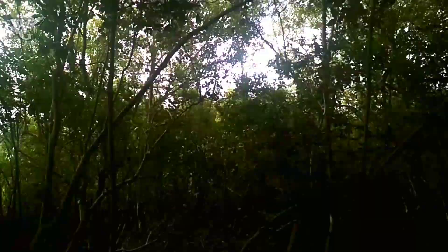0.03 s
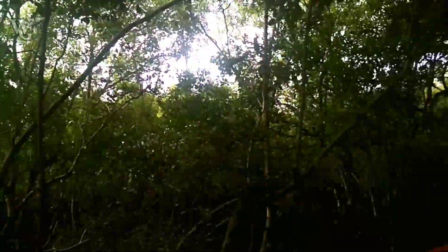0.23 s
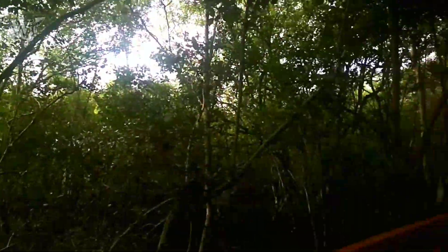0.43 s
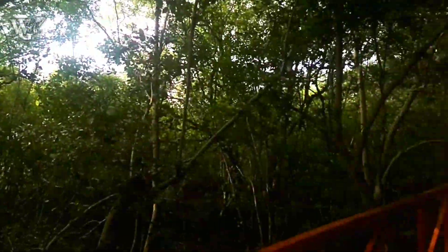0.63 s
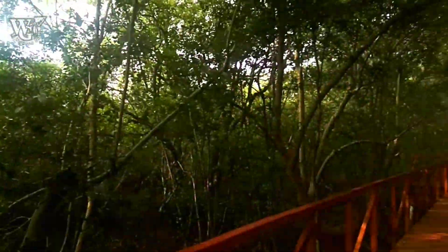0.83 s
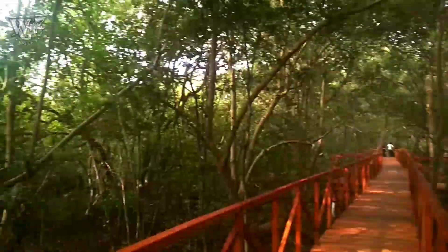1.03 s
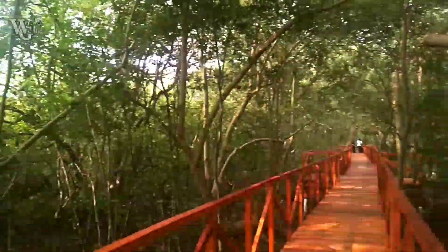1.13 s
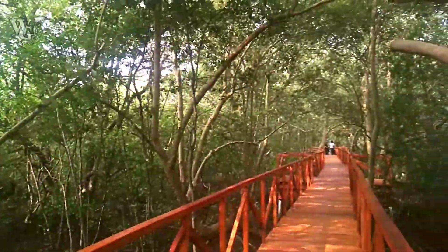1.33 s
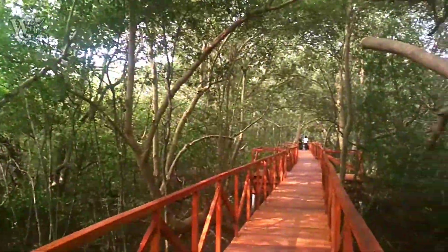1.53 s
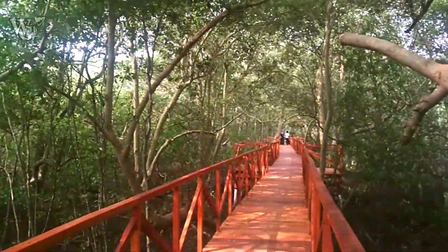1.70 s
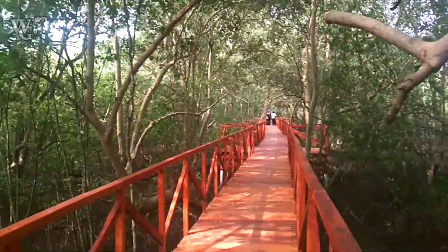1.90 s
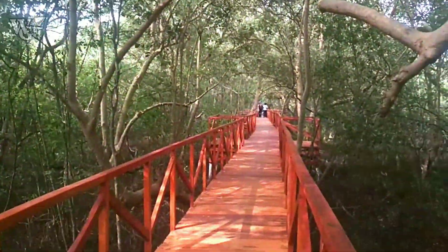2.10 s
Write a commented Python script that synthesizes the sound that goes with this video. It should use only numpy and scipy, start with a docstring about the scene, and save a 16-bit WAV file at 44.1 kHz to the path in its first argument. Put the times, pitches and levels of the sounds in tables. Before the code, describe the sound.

Wind rumbles and thumps unevenly on a hand-held microphone moving along a wooden boardwalk in a forest. Light, irregular footstep knocks and dry scuffs sit within it, while small birds chirp faintly and a high insect sings in phrases.

```python
"""Mangrove boardwalk, wind on the microphone.

Air buffets the two ports of a hand-held microphone: the eddy rumble swells and thumps with the
walker's movement and clips at its peaks. Light knocks and dry scuffs sit within it.
Behind, small birds chirp among echoing trees and a high insect sings in phrases,
over a far insect chorus and the hush of the wood."""
import sys
import numpy as np
from scipy import signal
from scipy.fft import rfft, irfft
from scipy.io import wavfile
from scipy.ndimage import uniform_filter1d, minimum_filter1d

SR = 44100
rng = np.random.default_rng(int(sys.argv[2]) if len(sys.argv) > 2 else 0)


def persist_wave(psi):
    """Save psi, clipped to +-1, as 16-bit WAV."""
    counts = np.round(np.clip(psi, -1, 1) * 32767).astype(np.int16)
    wavfile.write(sys.argv[1], SR, np.atleast_2d(counts).T)


N = 95167
TIME_S = np.arange(N) / SR
FREQ_HZ = np.maximum(np.fft.rfftfreq(N, 1 / SR), 1)

# airflow at each port: (time [s], level [dB], eddy roll-off corner [Hz])
AIRFLOW_LEFT = [(0.0,1.5,230), (0.06,-13,200), (0.10,-26.5,144), (0.138,-42.5,141.4), (0.15,-18.5,160),
                (0.25,-11,339.6), (0.31,-18.5,240), (0.36,-12,432), (0.39,-17.5,271), (0.52,-17,180),
                (0.63,-9,305.6), (0.66,-17.5,240), (0.76,-28.5,180), (0.88,-36,150), (0.99,-17.5,150),
                (1.02,-32.5,170), (1.07,-19,200), (1.16,-4,280), (1.20,-24,208), (1.26,-41,178),
                (1.35,-21.5,140), (1.44,-28.5,180), (1.5,-18.5,150), (1.64,-27,180), (1.7,-26,170),
                (1.89,-26,160), (1.93,-23,160), (2.04,-28.5,210), (2.16,-22.5,190)]
AIRFLOW_RIGHT = [(0.0,-32,189.6), (0.07,-34,169.5), (0.16,-29.5,163.4), (0.22,-16.5,244.3),
                 (0.25,-32,254.6), (0.28,-17,224.5), (0.5,-16,282), (0.53,-24,287.5), (0.6,-23,245),
                 (0.64,-17,307), (0.74,-16.5,369), (0.85,-25,184), (0.91,-15.5,390), (0.96,-22.5,268),
                 (1.03,-15,287), (1.2,-15,372), (1.33,-25.5,180.3), (1.4,-15,308), (1.5,-17,305.6),
                 (1.65,-14,287.6), (1.73,-17,230.5), (1.81,-18,418), (1.94,-20,244), (2.03,-21,270),
                 (2.16,-16.5,332.4)]
# airflow trim: (left [dB], right [dB])
AIR_TRIM_DB = [3.5, 0.0]
# port response to air: (frequency [Hz], gain [dB])
PORT_RESPONSE = [(10, -27), (25, -7), (60, -5.5), (110, 2), (170, -4.5), (320, -4.5), (500, -10),
                 (780, -7.5), (1050, -17), (1500, -32)]
# dull thumps: (time [s], level [dB], pitch [Hz], Gaussian width [s])
PORT_THUMPS_LEFT = [(.0075, 2.5, 113, 0.0045), (0.152, -0.5, 70.3, 0.0046), (0.227, 4, 129.6, 0.0025),
                    (.2420, 5.5, 130.5, 0.0068), (.2530, 6, 195, 0.0016), (0.345, 4.5, 141.6, 0.0096),
                    (.3620, 7.5, 245.6, 0.0047), (0.367, 2.5, 159.4, 0.0035), (.4430, 0.5, 98, 0.0035),
                    (0.62, -1, 195, 0.0019), (1.0662, 2, 129.6, 0.003), (1.1380, 4, 114.5, 0.00635),
                    (1.1560, 2, 139, 0.0014), (1.8740, -2, 108, 0.0027)]
PORT_THUMPS_RIGHT = [(0.362, -1.5, 140, 0.0018), (0.492, 3, 140, 0.0031), (.9780, -1.5, 161, 0.0017),
                     (1.0567, 2, 160, 0.0018), (1.1700, 3.5, 225, 0.0013), (1.737, -3, 105, 0.005),
                     (1.7770, 3.5, 155, 0.002), (2.004, -1, 130, 0.0013)]
# fine turbulence on a thump: (frequency [Hz], gain [dB])
CHURN_SPECTRUM = [(120, -16.5), (300, 13), (550, 2), (900, -18), (1500, -34.5), (3000, -43.5),
                  (8000, -75.5)]
# falling bird notes: (onset [s], length [s], start [Hz], end [Hz], level [dB], left-right [dB])
BIRD_CHIRPS = [(0.267, 0.014, 7900, 7710, -73.5, 8), (0.285, 0.022, 7710, 6080, -46.5, -0.5),
               (0.577, 0.016, 7420, 5090, -47, 6), (1.029, 0.057, 7760, 5575, -36.5, 11),
               (1.371, 0.067, 7660, 6600, -48.5, 13), (1.408, 0.035, 6100, 5140, -50.5, 10.5)]
# arched bird calls: (onset [s], length [s], foot [Hz], top [Hz], level [dB], left-right [dB])
BIRD_CALLS = [(.0, 0.02, 1466, 1594, -39.5, 12.5), (.0, 0.033, 1860, 2574, -49.5, 19.5),
              (1.133, 0.065, 2028, 2720, -47, 16.5), (1.175, 0.047, 2450, 2870, -53.5, 19.5)]
# insect song: (start [s], end [s], level [dB], pitch [Hz])
INSECT_PHRASES = [(0, 0.394, -71.5, 8500), (0.095, 0.104, -50, 8490), (0.587, 0.911, -59, 8440),
                  (0.798, 0.83, -54.5, 8450), (0.964, 1.006, -50.5, 8440), (1.27, 1.75, -51.5, 8510),
                  (1.506, 1.715, -45.5, 8380), (1.934, 2.202, -55, 8410)]
# far insect chorus and hush of the wood: (frequency [Hz], gain [dB])
CHORUS_SPECTRUM = [(10500, -20), (11150, 3), (11400, -7.5), (11650, 2), (11950, -9.5), (12300, 1.5),
                   (12750, -9), (13100, -5.5), (13700, -14), (15200, -4.5), (16000, -34)]
HUSH_SPECTRUM = [(100, -5.5), (700, 4.5), (1300, -4.5), (2200, -11.5), (4000, -18.5), (7000, -21),
                 (10000, -23), (15000, -28)]
# their envelopes: (time [s], level [dB])
CHORUS_ENVELOPE = [(0, -73), (.45, -73.5), (.9, -65.5), (1.6, -65.5), (2.16, -70)]
HUSH_ENVELOPE = [(0, -60.5), (0.898, -62.5), (1.499, -59), (1.951, -60.5), (2.15, -51.5)]
# small knocks of air at the port: (time [s], level [dB], pitch [Hz], left-right [dB])
PORT_KNOCKS = [(.150, -27.5, 410, 14), (.432, -12, 420, 17), (.612, -23.5, 448, 28),
               (.643, -12, 380, -12), (.688, -10.5, 400, -18), (.704, -23.5, 520, -12.5),
               (.733, -19, 570, -26), (.879, -19, 430, -27), (.906, -10.5, 355, -36),
               (.914, -14, 489, -29), (.934, -6.5, 300, -33.5), (.977, -16.5, 430, -21.5),
               (1.037, -12, 380, -19), (1.268, -12, 268, -18.5), (1.398, -13, 393, -20),
               (1.545, -21, 500, -22.5), (1.560, -15.5, 480, -39), (1.612, -17.5, 450, -34),
               (1.648, -8.5, 420, -38), (1.699, -23, 546, -22), (1.808, -34, 450, -12),
               (1.83, -16.5, 480, -43), (1.883, -27.5, 480, -7.5), (1.911, -21, 600, -34),
               (1.995, -24.5, 750, -34), (2.055, -21.5, 420, -25)]
# scuffs and ticks: (onset [s], level [dB], centre [Hz], decay [s], left-right [dB])
DRY_SCUFFS = [(0.15, -50.5, 1000, 0.02, 28.5), (.262, -50.5, 1000, 0.047, 24.5),
              (0.325, -40.5, 1200, 0.025, 21.5), (0.433, -53.5, 860, 0.024, 18),
              (0.631, -57, 1500, 0.023, 2), (1.062, -50.5, 1480, 0.033, 11.5),
              (1.812, -50, 2530, 0.0016, -8.5), (2.1430, -36, 2340, 0.0019, -28)]


def from_db(db):
    """Decibels to gain."""
    return 10 ** (np.asarray(db) / 20)


def unit_rms(x):
    """Scale to unit power."""
    return x / np.sqrt(np.mean(x ** 2) + 1e-20)


def per_sample(curve):
    """Value columns of a time curve at every sample."""
    times_s, *columns = np.transpose(curve)
    return [np.interp(TIME_S, times_s, column) for column in columns]


def gain_at(spectrum, hz):
    """Spectrum gain, interpolated over log frequency."""
    points_hz, db = np.transpose(spectrum)
    return from_db(np.interp(np.log(hz), np.log(points_hz), db))


def noise(gains):
    """Unit-RMS noise with the given gain per frequency."""
    return unit_rms(irfft(rfft(rng.standard_normal(N)) * gains, N))


def flicker(bandwidth_hz, rms_db):
    """Random gain wander."""
    return from_db(rms_db * noise(np.exp(-(FREQ_HZ / bandwidth_hz) ** 2)))


def pan(left_right_db):
    """Stereo gains; only the weaker side is turned down."""
    return from_db([[min(left_right_db, 0)], [min(-left_right_db, 0)]])


def eddies(curve, rolloff=1.533, steady_s=0.038, steadiness=0.5):
    """Rumble at one port; faster air sheds smaller eddies and opens the spectrum upward."""
    level_db, corner_hz = per_sample(curve)
    white = rfft(rng.standard_normal(N))
    centres_hz = np.geomspace(12, 1500, 22)
    rumble = 0
    for hz, weights in zip(centres_hz, np.eye(len(centres_hz))):
        band = irfft(white * np.interp(FREQ_HZ, centres_hz, weights, right=0), N)
        lowpass = np.exp(-(hz / np.maximum(corner_hz, 50)) ** rolloff)
        rumble += band * gain_at(PORT_RESPONSE, hz) * lowpass
    rumble = unit_rms(rumble)
    span = int(steady_s * SR)
    power = uniform_filter1d(uniform_filter1d(rumble ** 2, span), span // 2)
    steadied = rumble / (power + 1e-9) ** (steadiness / 2)
    return from_db(level_db) * unit_rms(steadied)


def limit(x, ceiling=0.85, span=SR // 100):
    """Smooth peak limiter; holds eddies short of overload."""
    envelope = np.abs(signal.hilbert(x))
    excess = np.maximum(envelope / ceiling, 1)
    held = -minimum_filter1d(-excess, 2 * span)
    return x / uniform_filter1d(uniform_filter1d(held, span), span)


def buffeting(curve, trim_db, thumps, churn_db=-22.5, churn_db_per_db=1.99):
    """Air at one port; each thump is a suck and a push that briefly displace the eddies."""
    out = limit(from_db(trim_db) * eddies(curve))
    turbulence = noise(gain_at(CHURN_SPECTRUM, FREQ_HZ))
    for time_s, db, hz, width_s in thumps:
        swell = np.exp(-0.5 * ((TIME_S - time_s) / width_s) ** 2)
        push = from_db(db) * np.sin(2 * np.pi * hz * (TIME_S - time_s))
        churn = from_db(churn_db + churn_db_per_db * db) * turbulence
        out = out * (1 - swell) + swell * (push + churn)
    return out


def whistle(hz, progress, warble_hz=88.8, warble_depth=0.049, octave_db=-24):
    """Bird note with a faint octave; warble deepens as progress runs from 0 to 1."""
    warble = 1 + warble_depth * progress * np.sin(2 * np.pi * (warble_hz * TIME_S + rng.random()))
    phase = 2 * np.pi * np.cumsum(hz * warble) / SR
    envelope = np.abs(np.sin(np.pi * progress)) ** 0.28
    return envelope * (np.sin(phase) + from_db(octave_db) * np.sin(2 * phase))


def among_trees(x, pan_db, t60_s, build_s=0.028, direct_gain=0.2):
    """Direct sound plus scatter off the trunks, different per channel."""
    t = TIME_S[:SR // 2]
    envelope = (1 - np.exp(-t / build_s)) * from_db(-60 * t / t60_s)
    tails = [unit_rms(rng.standard_normal(len(t)) * envelope) / np.sqrt(len(t)) for _ in range(2)]
    scatter = np.array([signal.fftconvolve(x, tail)[:N] for tail in tails])
    return (direct_gain * x + scatter) * from_db([[pan_db / 2], [-pan_db / 2]])


def birds(chirp_bend=1.3):
    """High chirps slide down; lower calls rise and fall."""
    out = 0
    for onset_s, length_s, start_hz, end_hz, db, pan_db in BIRD_CHIRPS:
        progress = np.clip((TIME_S - onset_s) / length_s, 0, 1)
        hz = start_hz + (end_hz - start_hz) * progress ** chirp_bend
        out += among_trees(from_db(db) * whistle(hz, progress), pan_db, t60_s=0.27)
    for onset_s, length_s, foot_hz, top_hz, db, pan_db in BIRD_CALLS:
        progress = np.clip((TIME_S - onset_s) / length_s, 0, 1)
        hz = foot_hz + (top_hz - foot_hz) * np.sin(np.pi * progress)
        out += among_trees(from_db(db) * whistle(hz, progress), pan_db, t60_s=0.16)
    return out


def insect(width_hz=120, attack_s=0.014, release_s=0.035):
    """Narrow, fluttering noise tone on the left, sung in phrases."""
    out = 0
    for start_s, end_s, db, hz in INSECT_PHRASES:
        attack = np.clip((TIME_S - start_s) / attack_s, 0, 1)
        release = np.exp(-np.maximum(TIME_S - end_s, 0) / release_s)
        band = np.exp(-((FREQ_HZ - hz) / width_hz) ** 2)
        out += from_db(db) * attack * release * np.array([noise(band), noise(band)])
    return out * flicker(bandwidth_hz=22, rms_db=4) * pan(left_right_db=24.5)


def diffuse(spectrum, envelope):
    """Far sound, uncorrelated between channels."""
    level_db, = per_sample(envelope)
    return from_db(level_db) * np.array([noise(gain_at(spectrum, FREQ_HZ)) for _ in range(2)])


def chorus():
    """Far insects merge into a flickering hiss, left of centre."""
    hiss = diffuse(CHORUS_SPECTRUM, CHORUS_ENVELOPE)
    return hiss * pan(left_right_db=8) * flicker(bandwidth_hz=20, rms_db=1.9)


def hush():
    """Soft broadband background of the wood."""
    return diffuse(HUSH_SPECTRUM, HUSH_ENVELOPE)


def knocks(width_cycles=0.62):
    """A cycle or two of dull pressure each, mostly at one port."""
    out = 0
    for time_s, db, hz, pan_db in PORT_KNOCKS:
        cycles = (TIME_S - time_s) * hz
        envelope = np.exp(-0.5 * (cycles / width_cycles) ** 2)
        tone = np.cos(2 * np.pi * (cycles + rng.random()))
        out += from_db(db) * envelope * tone * pan(pan_db)
    return out


def scuffs(q=5.2):
    """Dry rubs and cracks near the microphone: decaying resonant noise."""
    out = 0
    for onset_s, db, hz, decay_s, pan_db in DRY_SCUFFS:
        resonance = 1 / np.hypot(1, q * (FREQ_HZ / hz - hz / FREQ_HZ))
        envelope = (TIME_S >= onset_s) * np.exp(-np.abs(TIME_S - onset_s) / decay_s)
        out += from_db(db) * envelope * noise(resonance) * pan(pan_db)
    return out


def scene():
    """Air on both ports in front of the wood, stereo."""
    left = buffeting(AIRFLOW_LEFT, AIR_TRIM_DB[0], PORT_THUMPS_LEFT)
    right = buffeting(AIRFLOW_RIGHT, AIR_TRIM_DB[1], PORT_THUMPS_RIGHT)
    return np.array([left, right]) + chorus() + knocks() + birds() + insect() + hush() + scuffs()


def record(dry, fade_s=0.004, cutoff_hz=15600):
    """Clip the strongest buffets at full scale, fade the end, low-pass."""
    fade = np.minimum((TIME_S[-1] - TIME_S) / fade_s, 1)
    lowpass = signal.ellip(8, 0.05, 50, cutoff_hz, fs=SR, output="sos")
    return signal.sosfiltfilt(lowpass, np.clip(dry, -1, 1) * fade)


dry = scene()
out = record(dry)
persist_wave(out)
```